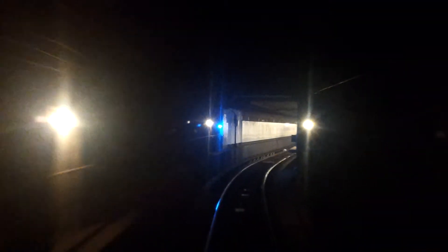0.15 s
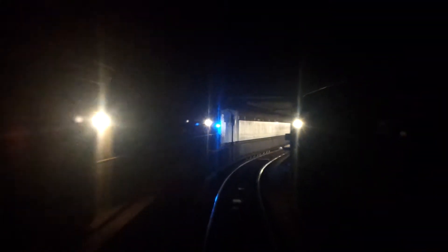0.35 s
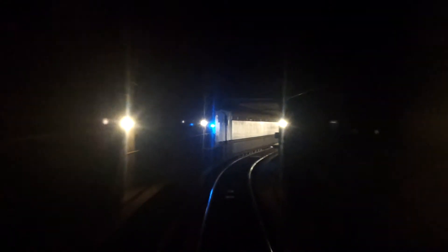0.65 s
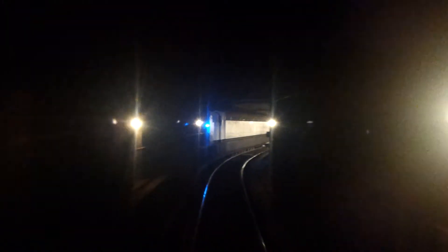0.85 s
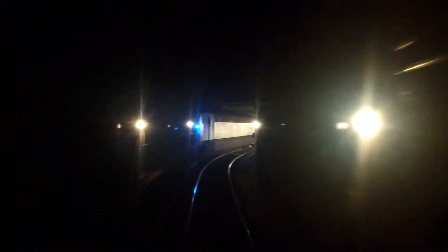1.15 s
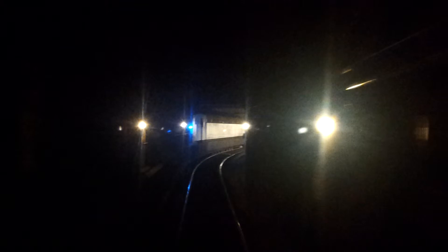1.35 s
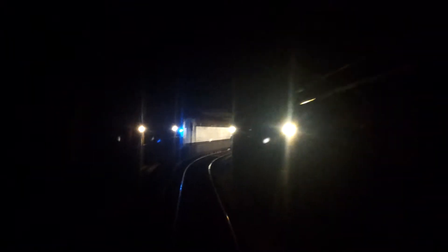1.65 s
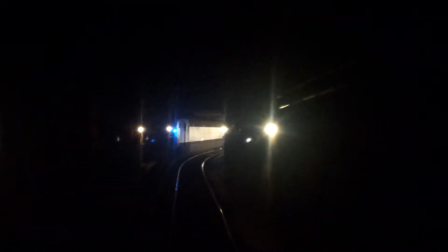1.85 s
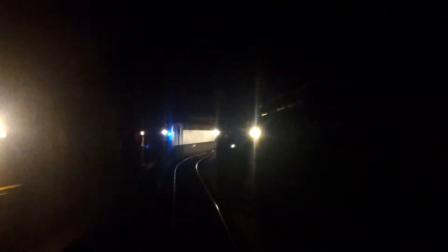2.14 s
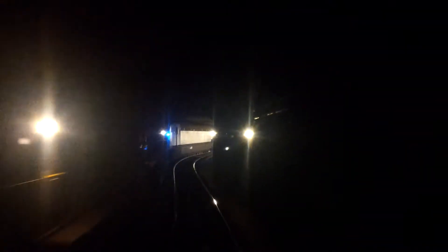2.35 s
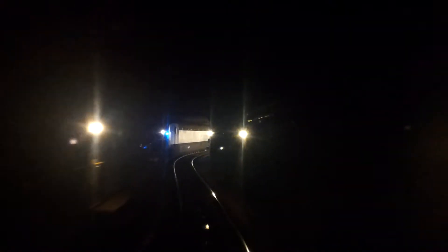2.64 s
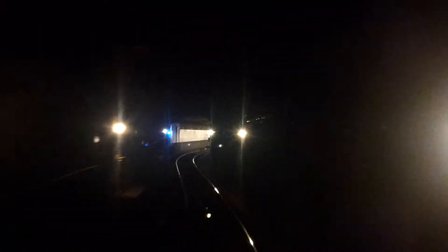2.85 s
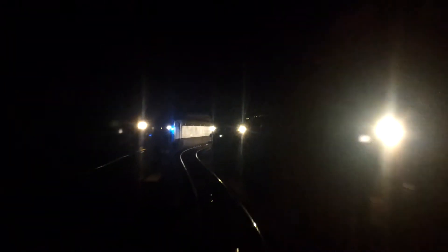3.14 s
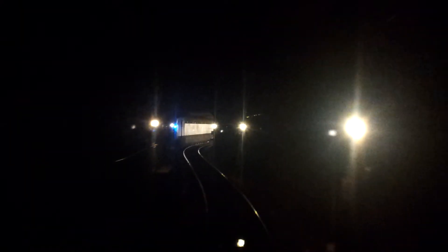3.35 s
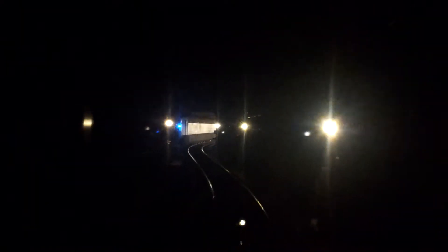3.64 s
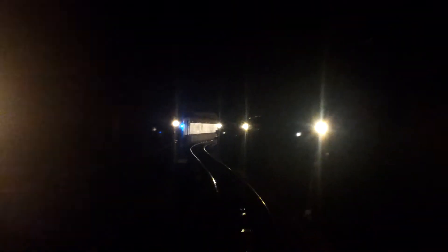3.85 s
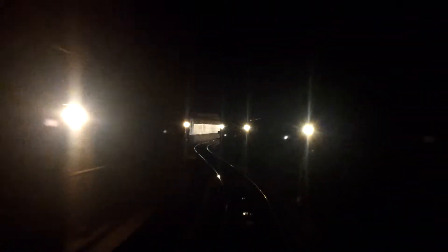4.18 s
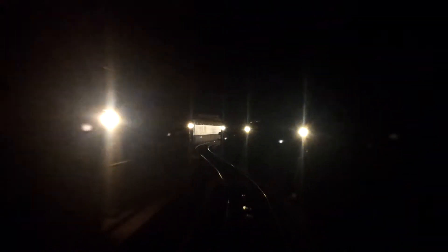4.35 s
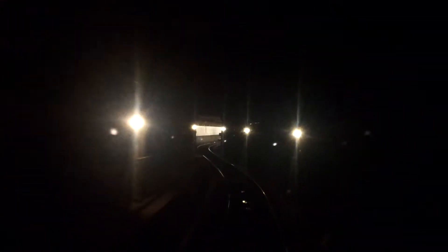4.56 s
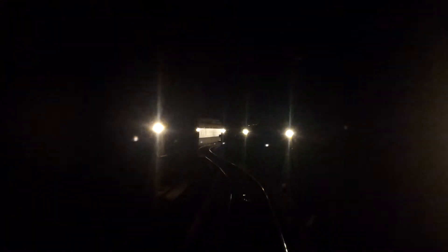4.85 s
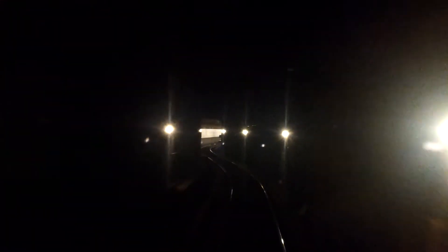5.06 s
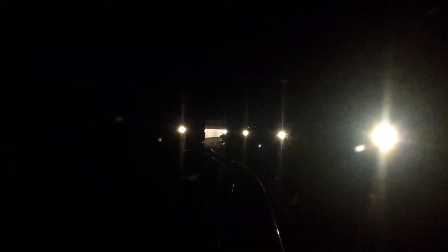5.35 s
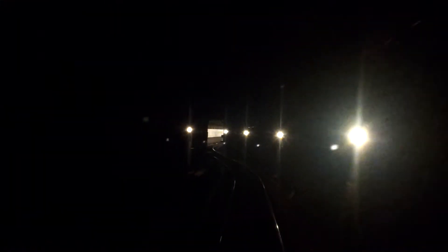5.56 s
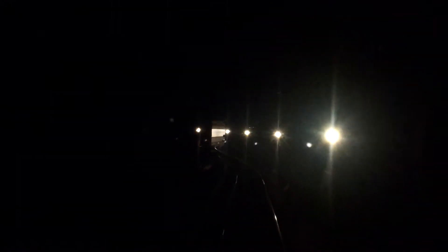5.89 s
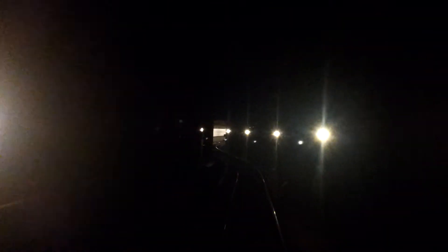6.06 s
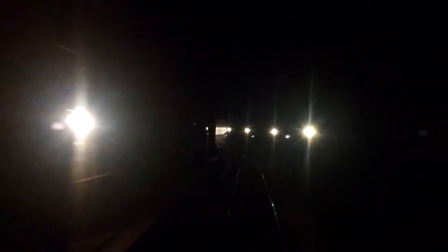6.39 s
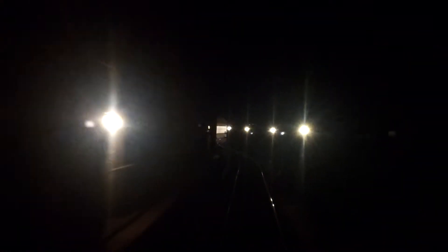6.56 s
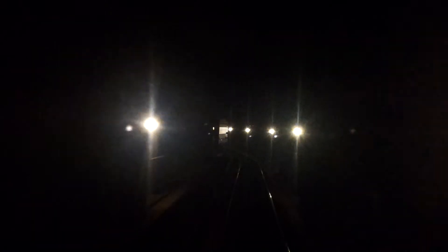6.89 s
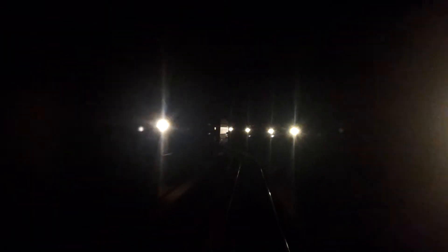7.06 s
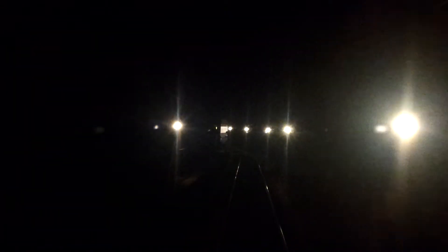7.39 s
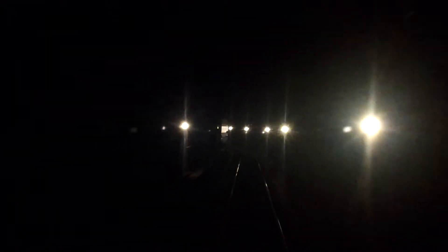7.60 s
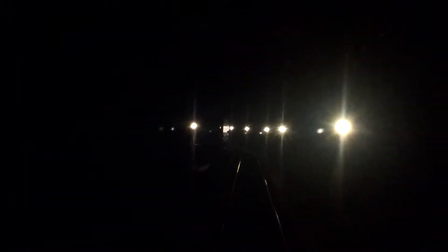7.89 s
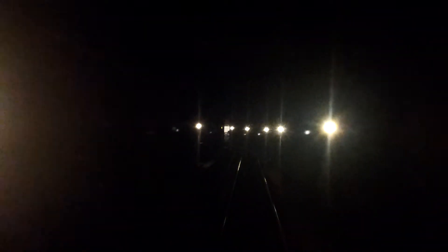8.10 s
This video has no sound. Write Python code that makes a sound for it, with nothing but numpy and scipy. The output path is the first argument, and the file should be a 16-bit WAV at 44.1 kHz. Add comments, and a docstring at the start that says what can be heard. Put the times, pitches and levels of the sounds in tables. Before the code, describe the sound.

Constant loud train rumble and mid-range roar in a tunnel, heard from the cabin, with metallic rail singing, flange scrapes and wheel moans.

```python
"""Subway ride through a curved tunnel

A train runs at a steady speed, heard from inside the front car. Shaped noise makes the wheels roar and
the flanges hiss, rub and scrape; wandering tones make the rails sing, the cabin boom and a wheel moan.
Decaying noise bursts rattle loose fittings, and thin sines whine for the electric drive.
Fast gain control holds the loudness even, so source levels are mix levels ahead of it."""
import sys
import numpy as np
from scipy import signal
from scipy.fft import rfft, irfft, next_fast_len
from scipy.io import wavfile
from scipy.ndimage import uniform_filter1d, minimum_filter1d, map_coordinates

SR = 44100
rng = np.random.default_rng(int(sys.argv[2]) if len(sys.argv) > 2 else 0)


def store_pcm(level_fs):
    """Save levels as 16-bit WAV."""
    pcm = np.round(np.clip(level_fs, -1, 1) * 32767).astype(np.int16)
    wavfile.write(sys.argv[1], SR, np.atleast_2d(pcm).T)


N = 362943
TIME = np.arange(N) / SR  # seconds

# tightness of the curve: t/s, tightness (0 straight - 1 tight)
BEND = [(0, 0.73), (2.1, 0.85), (2.85, 0.75), (3.05, 0.59), (4.5, 0.71), (4.95, 0.1), (8.23, 0.059)]
# sideways slip of the treads: t/s, level/dB over the usual slip
SLIP = [(0, -2), (1.2, 0.7), (1.6, 3), (2.35, 2.8), (2.56, 1.2), (2.87, 1.3), (2.97, -0.9), (4.3, -3.5),
        (4.8, 0.1), (5.2, -0.8), (5.7, -0.5), (6.7, 1), (7.2, -2), (8.23, -1.5)]
# stretches of corrugated rail: start/s, end/s, extra drumming/dB
RIPPLES = [(.2, .48, 3.5), (1.45, 2.2, 3), (4.15, 4.6, 7), (4.68, 5.0, 4.5), (5.23, 5.5, 5),
           (5.78, 7.55, 4), (7.62, 7.88, 7)]
# stretches of uneven track that set the cabin booming: start/s, end/s, f/Hz, level/dB rms
BUMPS = [(-0.1, 0.167, 170.4, -18.5), (0.99, 1.253, 168, -17.5), (1.33, 1.585, 172.4, -21.5),
         (1.88, 2.098, 150, -19), (2.2, 2.607, 172, -21), (2.05, 2.8, 93.9, -26), (5.0, 5.6, 55.4, -31),
         (6.007, 6.293, 168.8, -18.5), (7.0, 7.703, 87.5, -30.5), (7.55, 7.795, 211.8, -20),
         (7.904, 8.35, 170.7, -17.5)]
RUN_ON_S = 0.24  # fade as the wheels run onto a stretch or off it, centred on its edge
BOOM_WANDER_HZ = 9

# spectra of the rolling noise, floor then tunnel: f/Hz, relative density/dB per Hz
RUMBLE_SPECTRUM = [(12, -23), (30, -29), (42, -17), (54, -1.5), (74, -6), (100, -0.5), (170, -4),
                   (240, -8.5), (400, -24), (900, -78)]
ROAR_SPECTRUM = [(130, -30.5), (250, -3), (290, -1.5), (345, -3.5), (470, 0), (505, -2.5), (660, 0),
                 (850, -4), (1000, -6.5), (1300, -12), (2200, -32), (4000, -87.5)]
# spectra of the rail ring, in the curve then on straight track: f/Hz, relative density/dB per Hz
RAIL_BENT = [(700, -35.5), (1050, -9.5), (1250, 0), (1400, 0), (1500, 2), (1620, -1), (1780, -8.5),
             (1950, -12), (2250, -22), (3200, -51), (8000, -82.5)]
RAIL_STRAIGHT = [(700, -29), (1050, -4.5), (1250, -1), (1400, 3), (1500, -1), (1620, -3.5), (1780, -9),
                 (1950, -19), (2250, -34), (3200, -43.5), (8000, -80.5)]
# resonances of the cabin air, the rail ripples and the car panels: f/Hz, width/Hz, relative level/dB
CABIN = [(101.6, 15, -12), (138.7, 13, -1), (170.4, 15, -1), (221, 20, -4.5)]
CORRUGATION = [(385.5, 12, -0.58), (396, 20, 1.2), (436.5, 24, 1.4)]
PANELS = [(288, 37, 0.7), (469, 8.5, -4), (532, 9.8, -5), (550, 12, -8.5), (642, 69, -6), (764, 23, -12.5),
          (801, 18, -11.5), (848, 17, -6), (903, 16, -6), (972, 14, -11)]
# level of the tunnel roar: t/s, level/dB over its usual value
ROAR_SWELL = [(0, -1), (1.2, 0.5), (1.8, 0.2), (2.6, -0.6), (3.2, 0), (4.4, -.9), (5, 0.3), (6.6, 0.7),
              (7.4, 0), (8.23, -0.5)]
RUMBLE_DB, BOOM_DB, DRUM_DB, ROAR_DB, RAIL_DB = -22.5, -20, -24, -13.5, -18.5  # usual levels
RAIL_PER_SLIP = 0.44  # dB of rail ring per dB of slip
# clean tones of the rail ripples: f/Hz, level/dB beside their drumming
HUMS = [(401, -4.5), (433, -7.5)]
HUM_WANDER_HZ, HUM_SWAY_DB = 10, 2.5

# notes the rails sing under the wheels: f/Hz, straight-track level/dB rms, tightest-curve level/dB rms
RAIL_NOTES = [(1095, -31.5, -33.5), (1223, -30, -38.5), (1378, -29.5, -30.5), (1486, -30, -27.5)]
RAIL_WANDER_HZ, RAIL_SWAY_DB = 25.13, 1.5  # how far those notes stray in pitch and in level

# spectrum of slipping treads and grit: f/Hz, relative density/dB per Hz
HISS_SPECTRUM = [(1400, -21.5), (2200, -2.5), (3500, 7), (4450, 5.5), (4900, 3.5), (5750, 6), (6100, 5),
                 (6500, 2), (7000, 3.5), (7450, 1.5), (8100, -3), (8800, -12), (9800, -42.5)]
HISS_DB = -34.5  # at the usual slip
# resonances of the rubbing flange and the ringing wheel: f/Hz, width/Hz, relative level/dB
FLANGE = [(2750, 500, 3), (3450, 510, -5.5)]
WHEEL = [(4180, 620, 2), (4200, 230, -4.5)]
# flange rub and wheel ring: straight-track level/dB, tightest-curve level/dB, dB per dB of slip
RUB_LAW = (-34.5, -45.5, .6)
RING_LAW = (-55.5, -34.5, 0.4)
# grit under the treads: cracks per second, dB at the usual slip, dB per dB of slip, decay by 60 dB
GRIT_PER_S, GRIT_DB, GRIT_PER_SLIP, GRIT_T60_S = 45, -47, 1.4, 0.016

# higher thin tones of the electric drive, each wavering around one level: f/Hz, usual level/dB rms
DRIVE = [(4265, -56.5), (5600, -56.5), (5687, -53.5), (6935, -59), (7454, -64.5), (7713, -66.5),
         (8271, -66), (8531, -69)]
# strength of its main tone: t/s, level/dB over WHINE_DB
WHINE = [(0, -2), (0.2, 3), (0.65, -4.5), (1.0, -0.5), (1.6, -4), (2.2, -6), (3.0, 0), (3.6, -2),
         (4.45, -5), (4.62, 6), (4.85, -.5), (5.7, -.5), (6.8, -2), (6.9, 10), (6.97, -3), (8.23, -3)]
WHINE_HZ, WHINE_DB = 2932, -45

# short scrapes of a flange, and the wide bursts near 6.9 s as the wheels cross a rail joint: t/s at the middle,
# length/s, f/Hz, width/Hz, level/dB at the top of the swell
SCRAPES = [(0.694, 0.032, 4200, 250, -31), (1.089, .07, 4400, 350, -35), (1.76, 0.03, 2450, 600, -31),
           (1.558, .09, 4200, 600, -36), (1.745, .03, 4300, 500, -32), (2.024, 0.046, 2040, 407, -28.5),
           (2.1, 0.063, 1830, 248, -25.5), (2.07, 0.024, 4030, 400, -32), (2.332, 0.069, 4620, 220, -29),
           (2.336, 0.037, 7650, 250, -38), (2.399, 0.016, 3500, 600, -34), (2.501, .014, 4000, 704, -28),
           (2.643, .03, 4450, 420, -28), (2.835, 0.07, 4040, 1106, -32.5), (3.522, .2, 3740, 700, -37),
           (3.992, 0.05, 2710, 90, -39), (5.727, 0.19, 3100, 1000, -39), (6.524, 0.06, 3160, 2210, -28),
           (6.893, 0.037, 2900, 110, -31.5), (6.689, 0.042, 4200, 3000, -37.5),
           (6.881, 0.03, 3970, 2410, -28.5), (6.915, 0.02, 3770, 2200, -33)]
# loose fittings knocking: t/s, strength/dB (sets their balance), t60/s
RATTLES = [(1.02, -33.5, .15), (1.495, -20.5, .15), (1.552, -24, .05), (2.004, -21.5, 0.1),
           (2.039, -24, 0.056), (2.247, -22, 0.21), (2.285, -25, 0.064), (2.323, -22, 0.2),
           (2.451, -18.5, 0.11), (2.494, -24.5, 0.073), (2.6, -26.5, 0.055), (3.291, -24.5, 0.067),
           (4.1, -27, 0.13), (6.521, -21, .025)]
RATTLE_TRIM_DB = -5.5  # added to every strength
# resonances of the fittings: f/Hz, width/Hz, relative level/dB
FITTINGS = [(3540, 800, -5), (4500, 6000, 4), (5800, 520, -13.5), (7300, 800, -9)]
# gliding moans of a wheel: start/s, end/s, first f/Hz, last f/Hz, level/dB rms at the top of the swell
MOANS = [(3.417, 3.66, 1458, 1435, -19), (3.599, 3.839, 1266, 1430, -24), (3.863, 4.061, 1410, 1510, -22.5),
         (4.06, 4.25, 1440, 1530, -25), (4.318, 4.621, 1350, 1580, -24), (4.851, 4.965, 1538, 1380, -24)]
MOAN_WANDER_HZ = 7
# a long scrape as the curve opens, rising in pitch: t/s, f/Hz, level/dB
RELEASE = [(4.4, 1754, -54), (4.58, 1820, -31), (4.72, 1930, -29.5), (4.83, 2253, -35), (4.93, 2602, -37),
           (5.1, 3000, -48)]
RELEASE_HALF_WIDTH_HZ = 420  # to either side of the pitch, where its noise is 6 dB down
# faint dry ticks, added after the gain control: t/s, starting level/dB
TICKS = [(4.690, -49.5), (6.5222, -35.5)]
TICK_HZ, TICK_T60_S = 11300, .002
TREBLE_HZ, TOP_HZ = 9900, 13000  # upper limit of the scene, and of the ticks


def amp(db):
    """Decibels to gain."""
    return 10 ** (np.asarray(db) / 20)


def unit(x):
    """Scale to rms 1."""
    return x / np.sqrt(np.mean(x ** 2) + 1e-20)


def curves(rows):
    """One value per sample for each column after the time."""
    s, *cols = np.transpose(rows)
    return [np.interp(TIME, s, c) for c in cols]


def wobble(rate):
    """A smooth random curve, rate knots a second."""
    coarse = TIME[::20]
    knots = rng.standard_normal(4000)
    return np.interp(TIME, coarse, map_coordinates(knots, [coarse * rate], mode="wrap"))


def filtered(x, response):
    """x times a response given as a function of frequency."""
    m = next_fast_len(N + SR // 2)
    return irfft(rfft(x, m) * response(np.fft.rfftfreq(m, 1 / SR)), m)[:N]


def coloured(x, spectrum):
    """x shaped by (Hz, dB) points on a log axis, at rms 1."""
    f, db = np.transpose(spectrum)
    return unit(filtered(x, lambda hz: amp(np.interp(np.log(hz + 1), np.log(f), db))))


def ringing(x, modes):
    """x through steep-sided resonances, at rms 1."""
    def band(f, centre, width):
        return np.abs(f * width / (centre ** 2 - f ** 2 + 1j * f * width)) ** 2

    # squaring narrows each band; the factor pi / 2 widens it again
    return unit(filtered(x, lambda f: sum(amp(db) * band(f, hz, width * np.pi / 2)
                                          for hz, width, db in modes)))


def noise():
    """Fresh white noise."""
    return rng.standard_normal(N)


def friction(grain_db, flutter_db):
    """Sliding steel: noise that catches and slips in small, uneven bursts."""
    return noise() * amp(grain_db * wobble(110) + flutter_db * wobble(14))


def singing(hz, wander_hz, rate):
    """A tone of rms 1 whose pitch strays slowly and quivers."""
    pitch = hz + wander_hz * (wobble(rate) + 0.7 * wobble(45))
    return np.sqrt(2) * np.sin(2 * np.pi * np.cumsum(pitch) / SR)


def tightness():
    """How tight the curve is, 0-1."""
    return np.clip(curves(BEND)[0], 0, 1)


def stretches(rows):
    """An amount that holds while the wheels run over each (start, end, amount) stretch of track."""
    total = np.zeros(N)
    for start, end, amount in rows:
        inside = np.minimum(TIME - start, end - TIME)
        total += amount * np.clip(.5 + inside / RUN_ON_S, 0, 1)
    return total


def rolling(sway_rate=3, boom_sway_db=0.4, drum_sway_db=0.5, roar_sway_db=0.38):
    """Rough wheels on rough rails: rumble through the floor, roar from the tunnel, ring from the rails."""
    bend = tightness()
    slip_db = curves(SLIP)[0]
    boom_db = BOOM_DB + boom_sway_db * wobble(sway_rate)
    drum_db = DRUM_DB + stretches(RIPPLES) + drum_sway_db * wobble(sway_rate)
    roar_db = ROAR_DB + curves(ROAR_SWELL)[0] + roar_sway_db * wobble(sway_rate)
    rail_db = RAIL_DB + RAIL_PER_SLIP * slip_db
    # the air in the cabin booms at its own low modes
    rumble = amp(RUMBLE_DB) * coloured(noise(), RUMBLE_SPECTRUM)
    boom = amp(boom_db) * ringing(noise(), CABIN)
    # ripples worn into the rail head drum at a pitch set by the speed
    drum = ringing(noise(), CORRUGATION)
    for hz, db in HUMS:
        drum = drum + amp(db + HUM_SWAY_DB * wobble(10)) * singing(hz, HUM_WANDER_HZ, rate=8)
    # the tunnel roar comes in through panels and panes, which ring along
    roar = unit(coloured(noise(), ROAR_SPECTRUM) + amp(-4.5) * ringing(noise(), PANELS))
    # side force in the curve brightens the ring of the rails
    contact = friction(grain_db=0.77, flutter_db=0.73)
    rail = bend * coloured(contact, RAIL_BENT) + (1 - bend) * coloured(contact, RAIL_STRAIGHT)
    return rumble + boom + amp(drum_db) * drum + amp(roar_db) * roar + amp(rail_db) * rail


def booming():
    """Uneven track shakes the car body, and the cabin air booms at one unsteady note."""
    return sum(amp(db) * stretches([(start, end, 1)]) * singing(hz, BOOM_WANDER_HZ, rate=9)
               for start, end, hz, db in BUMPS)


def rail_song(sway_rate=8):
    """The rails sing in wavering strands; the highest stands out in the curve."""
    bend = tightness()
    song = np.zeros(N)
    for hz, straight, tight in RAIL_NOTES:
        level_db = straight + (tight - straight) * bend + RAIL_SWAY_DB * wobble(sway_rate)
        song += amp(level_db) * singing(hz, RAIL_WANDER_HZ, rate=7)
    return song


def curving():
    """Slipping treads hiss; the wheels ring in the curve, and flange rub takes over as it opens."""
    bend = tightness()
    slip_db = curves(SLIP)[0]

    def level(straight, tight, follow):
        return amp(straight + (tight - straight) * bend + follow * slip_db)

    hiss = amp(HISS_DB + slip_db) * coloured(friction(grain_db=-0.16, flutter_db=0.5), HISS_SPECTRUM)
    rub = level(*RUB_LAW) * ringing(friction(grain_db=0.5, flutter_db=0.0), FLANGE)
    ring = level(*RING_LAW) * ringing(friction(grain_db=2.5, flutter_db=0.9), WHEEL)
    return hiss + rub + ring


def grit(scatter_db=4):
    """Grit cracks under the slipping treads, in sharp grains that grow with the slip."""
    cracks = (rng.random(N) < GRIT_PER_S / SR) * amp(scatter_db * np.clip(noise(), -2, 2))
    decay = amp(-60 * TIME[:SR // 10] / GRIT_T60_S)
    bursts = signal.fftconvolve(cracks, decay)[:N]
    level_db = GRIT_DB + GRIT_PER_SLIP * curves(SLIP)[0]
    return amp(level_db) * coloured(bursts * noise(), HISS_SPECTRUM)


def drive(waver_db=2.5, drift=0.59):
    """Thin electrical tones, wavering as the car sways; the main one swells and fades."""
    tones = [(WHINE_HZ, WHINE_DB + curves(WHINE)[0])] + list(DRIVE)
    whine = np.zeros(N)
    for hz, db in tones:
        phase = 2 * np.pi * hz * TIME + drift * wobble(20)  # drift in radians
        whine += amp(db + waver_db * wobble(22)) * np.sqrt(2) * np.sin(phase)
    return whine


def scrapes():
    """A flange bites the rail for a moment, catching and slipping, and sings in one rough band; near 6.9 s the
    wheels cross a rail joint in wide bursts."""
    out = np.zeros(N)
    for s, length, hz, width, db in SCRAPES:
        swell = np.exp(-2 * ((TIME - s) / length) ** 2)
        out += amp(db) * swell * ringing(noise() * amp(1.9 * wobble(115)), [(hz, width, 0)])
    return out


def rattles():
    """Each jolt makes loose fittings tick or chatter briefly."""
    jolts = np.zeros(N)
    for s, db, t60 in RATTLES:
        jolts += amp(db + RATTLE_TRIM_DB - 60 * np.abs(TIME - s) / t60) * (TIME >= s)
    return jolts * ringing(noise() * amp(1.8 * wobble(200)), FITTINGS)


def moans():
    """A wheel catches a note for a moment, and the note slides."""
    out = np.zeros(N)
    for start, end, first, last, db in MOANS:
        progress = np.clip((TIME - start) / (end - start), 0, 1)
        pitch = first + (last - first) * progress
        out += amp(db) * np.sin(np.pi * progress) * singing(pitch, MOAN_WANDER_HZ, rate=20)
    return out


def release():
    """The flange lets go of the rail: one rough band glides upward and fades."""
    hz, db = curves(RELEASE)
    scraping = friction(grain_db=2.0, flutter_db=1.0)
    rough = unit(filtered(scraping, lambda f: 1 / (1 + (f / RELEASE_HALF_WIDTH_HZ) ** 4)))
    # the gliding tone carries the low noise up to its own pitch
    return amp(db) * rough * np.sqrt(2) * np.sin(2 * np.pi * np.cumsum(hz) / SR)


def ticks():
    """Very short, bright ticks: high sines that start at once and die away in milliseconds."""
    out = np.zeros(N)
    for s, db in TICKS:
        decay = amp(db - 60 * np.abs(TIME - s) / TICK_T60_S) * (TIME >= s)
        out += decay * np.sin(2 * np.pi * TICK_HZ * (TIME - s))
    return out


def scene():
    """Everything that reaches the front cabin, as one channel."""
    wheels = rolling() + booming() + rail_song() + curving() + grit()
    moments = scrapes() + rattles() + moans() + release()
    return (wheels + drive() + moments)[None]


def power(x, window):
    """Running mean square, averaged twice over a window of seconds."""
    span = max(int(window * SR), 2)
    return np.abs(uniform_filter1d(uniform_filter1d(x ** 2, span), span)) + 1e-9


def levelled(x, fast=0.0084, slow=0.42, strength=0.89):
    """Fast gain control pulls each short swell or dip back towards the running level."""
    return x * np.sqrt(power(x, slow) / power(x, fast)) ** strength


def limited(x):
    """A limiter ducks smoothly around every peak near full scale."""
    ceiling, span = .95, int(.003 * SR)
    gain = minimum_filter1d(np.minimum(1, ceiling / (np.abs(x) + 1e-9)), 2 * span)
    return x * uniform_filter1d(uniform_filter1d(gain, span), span)


def record(dry):
    """The recorder evens the level, limits peaks and loses high treble; two faint ticks stand out above."""
    even = limited(levelled(dry[0]))
    dulled = filtered(even, lambda hz: (hz < TREBLE_HZ) / np.sqrt(1 + (hz / 8900) ** 20))
    return filtered(dulled + ticks(), lambda hz: hz < TOP_HZ)[None]


dry = scene()
out = record(dry)
store_pcm(out)
```